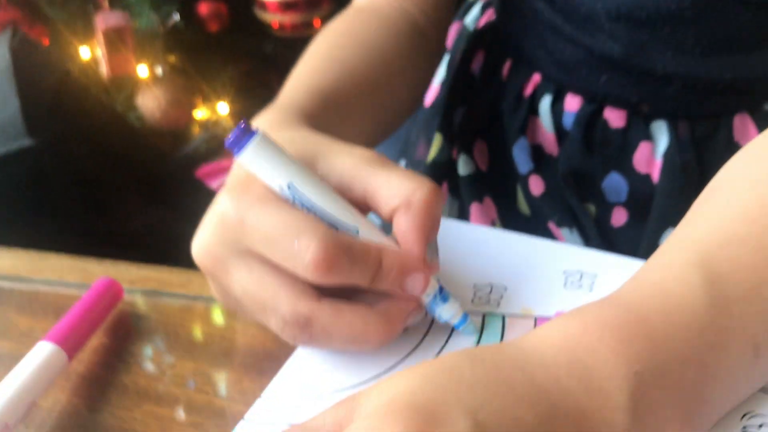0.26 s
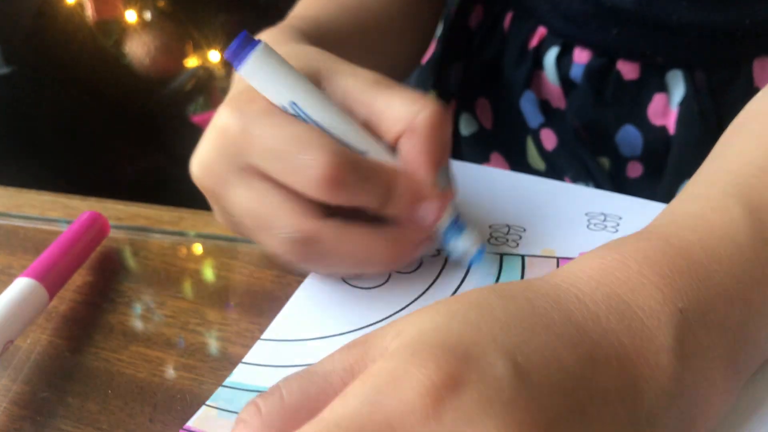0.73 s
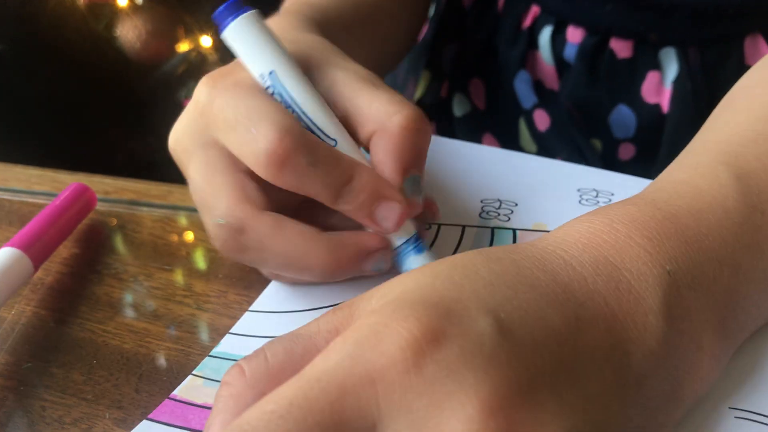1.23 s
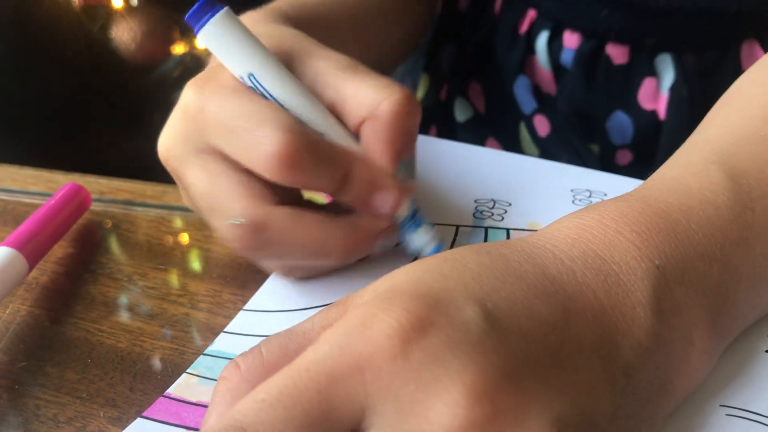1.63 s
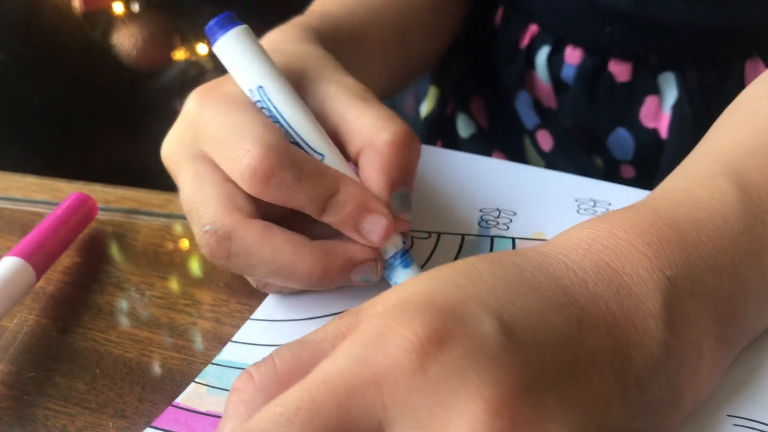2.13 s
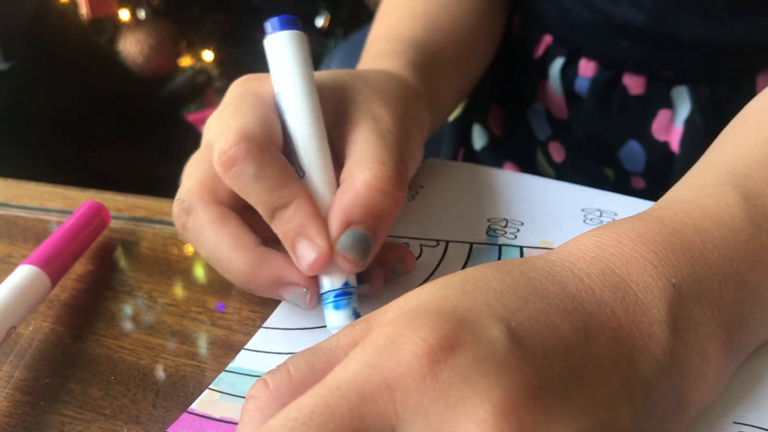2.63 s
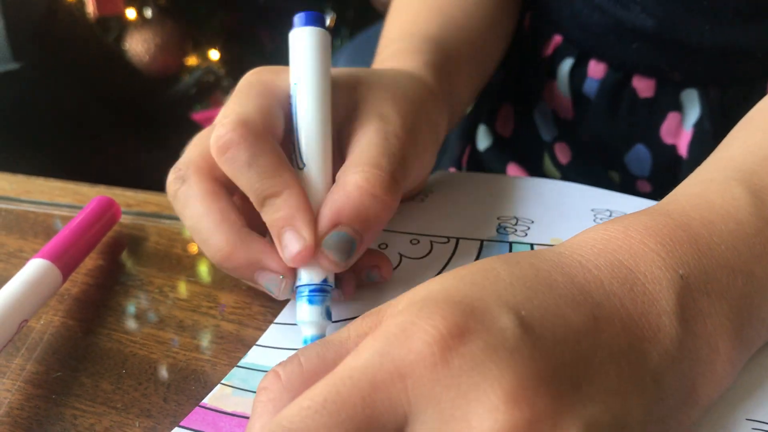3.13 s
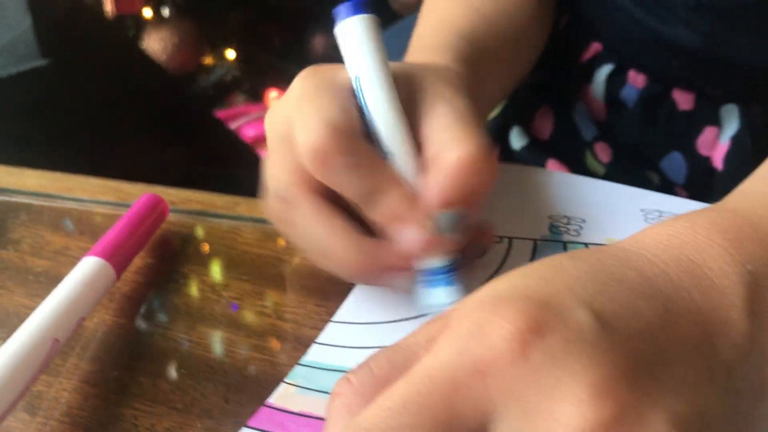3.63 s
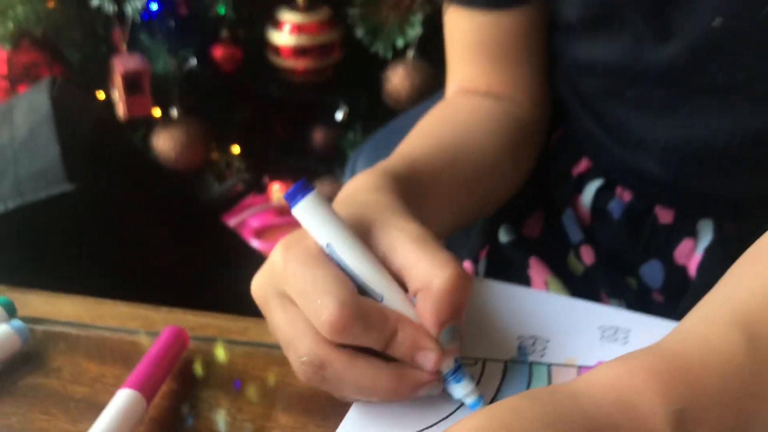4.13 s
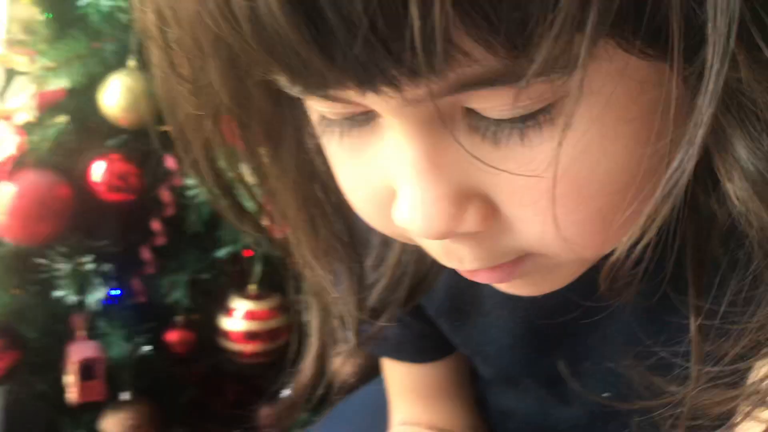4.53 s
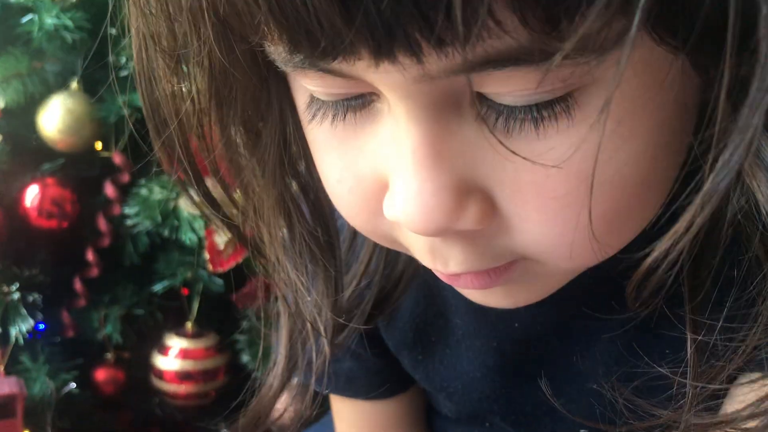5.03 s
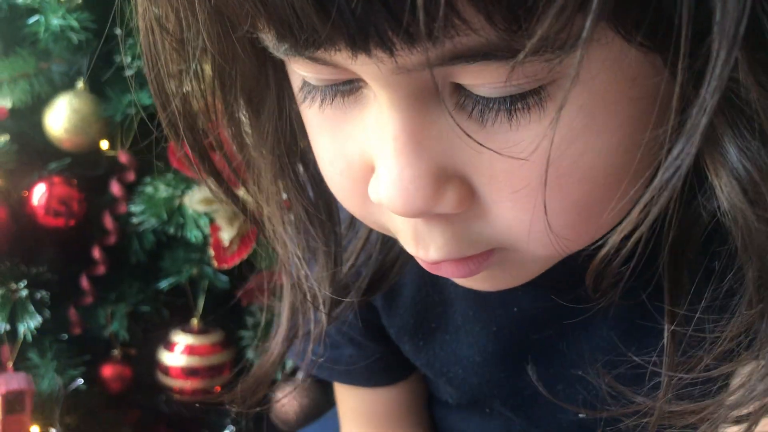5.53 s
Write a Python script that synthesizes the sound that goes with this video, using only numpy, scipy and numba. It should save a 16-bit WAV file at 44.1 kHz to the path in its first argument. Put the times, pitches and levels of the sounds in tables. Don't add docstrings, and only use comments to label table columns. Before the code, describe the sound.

A felt-tip marker scribbles in quick, dry back-and-forth strokes on paper over a wooden table, with small squeaks and knocks in a quiet room.

```python
import sys
import numpy as np
from scipy import signal
from scipy.io import wavfile
from scipy.ndimage import uniform_filter1d, map_coordinates
from numba import njit

SR = 44100
rng = np.random.default_rng(int(sys.argv[2]) if len(sys.argv) > 2 else 0)


def elevation(decibels):
    levels = np.asarray(decibels, float)
    return 10 ** (levels / 20)


def unload_audio(sound):
    columns = np.transpose(np.atleast_2d(sound))
    steps = np.round(np.clip(columns, -1, 1) * 32767)
    wavfile.write(sys.argv[1], SR, steps.astype(np.int16))


N = 254456
TIME = np.arange(N) / SR

# centre_hz, density_db_per_hz
AIR_SPECTRUM = [(32, -39), (55, -3.5), (97, -9.5), (188, -11.5), (613, -16), (740, -26), (1030, -16.5),
                (1340, -19.5), (1820, -26.5), (3360, -24.5), (3610, -26), (4790, -32.5), (6210, -31.5),
                (15600, -34.5)]
# time_s, air_db, hum_db
ROOM_LEVELS = [(0, -68, -2), (1.35, -67, -3.5), (1.448, -67.5, -1.5), (2.7, -69, -0.5), (4.2, -66.5, 0),
               (5.77, -68, 3.5)]
HUM_LINES_HZ = [32, 41.1, 99.9, 299.8, 329, 999.5]
HUM_LINES_DB = [-69, -64.5, -69.5, -74, -80, -81.5]
# time_s, level_db, centre_hz
HAND_RUB = [(0, -77, 520), (.96, -68, 640), (1.399, -78, 700), (1.75, -68, 700), (2.3, -73.5, 653),
            (2.68, -62, 670), (3.1, -73, 780), (3.85, -71, 683), (4.0, -64.5, 560), (4.38, -67, 540),
            (4.55, -71.5, 805), (5.2, -76.5, 860), (5.77, -68, 550)]
# start_s, peak_db, ring_hz
BUMPS = [
    (0.507, -58, 102),
    (.581, -59, 54.6),
    (.608, -52, 61),
    (.624, -49, 60),
    (.617, -51.5, 140),
    (.655, -56, 66),
    (.675, -58, 70),
]
# start_s, peak_db, thud_db, ring_hz, crack_db
KNOCKS = [(0.329, -54, -57, 1100, -80), (0.508, -50, -58, 1680, -46), (0.579, -47, -52, 700, -65),
          (3.008, -55, -52, 1000, -54), (3.574, -41, -62, 1870, -42), (3.775, -35.5, -72, 1860, -38),
          (5.525, -42, -57, 1150, -55), (5.578, -42.5, -66, 1140, -59), (5.7212, -33, -56, 2460, -39),
          (5.722, -44, -60, 4370, -45), (5.726, -43.5, -50, 597, -62)]
# start_s, length_s, rms_db, pitch_hz
SQUEAKS = [(1.498, 0.078, -52, 1660), (1.784, 0.044, -44, 1880), (2.444, 0.017, -51.5, 1840),
           (2.634, 0.056, -51, 1920), (3.195, 0.022, -54, 1250), (3.186, 0.028, -50.5, 1980),
           (3.208, 0.0134, -53, 840), (3.2, 0.014, -48, 3100), (3.616, 0.023, -47, 2130),
           (3.621, 0.029, -58.5, 736), (4.008, 0.048, -50.5, 1950), (4.518, 0.023, -53, 1760),
           (4.55, 0.026, -58, 2000), (4.581, .025, -61.5, 2140), (3.891, 0.1, -53.5, 4440),
           (5.133, 0.017, -57, 2450), (4.516, 0.082, -60.5, 950), (4.94, 0.073, -60, 930),
           (5.037, 0.035, -60, 1000), (5.124, 0.047, -61, 1010)]

# start_s, stop_s, early_db, mid_db, late_db (barrel level)
STROKES = [(0.445, 0.557, -53.5, -51.5, -46.5), (0.621, 0.745, -43.5, -41, -42),
           (0.788, 0.927, -40.5, -45.5, -45.5), (1.009, 1.151, -48, -44.5, -46.5),
           (1.215, 1.347, -49.5, -47, -49), (1.411, 1.563, -43, -45.5, -49.5),
           (1.646, 1.818, -49, -44, -45), (1.876, 2.009, -43, -48.5, -50.5), (2.06, 2.209, -48, -46.5, -50),
           (2.259, 2.401, -46.5, -48, -45), (2.455, 2.712, -48, -55.5, -50), (2.854, 2.999, -45, -43, -53),
           (3.054, 3.206, -53.5, -47, -41), (3.289, 3.425, -45, -45.5, -48),
           (3.479, 3.635, -44, -58, -46.5), (3.69, 3.837, -47.5, -54, -51),
           (3.888, 4.046, -52.5, -52.5, -47.5), (4.1, 4.213, -49.5, -48.5, -54.5),
           (4.273, 4.493, -54.5, -51, -52), (4.668, 4.799, -57, -51.5, -55),
           (4.858, 5.005, -54.5, -48, -59.5), (5.139, 5.226, -56.5, -55.5, -54),
           (5.295, 5.426, -53.5, -52.5, -56), (5.666, 5.726, -53.5, -51, -56)]
# start_s, stop_s, level_db, judder_db, hiss_db
TOUCHES = [(0, .025, -72.5, 0, -6), (0.041, .052, -66.5, -4.5, -7.5), (.073, 0.116, -63.5, -3, -1.5),
           (0.129, 0.132, -67, 6, -3), (.141, 0.166, -68.5, -2, -7), (0.347, 0.349, -72, 6.5, 8.5),
           (0.413, .421, -77, -3, -4), (2.738, 2.745, -54, 1, -7.5), (2.76, 2.766, -61.5, 10, -7),
           (4.521, 4.532, -52.5, 3, -8), (4.554, 4.562, -52, 1, -7), (4.572, 4.592, -70, 13, -5),
           (4.584, 4.61, -59, 5, -5), (5.05, 5.068, -71, 18, -6), (5.075, 5.094, -80, 11, -6),
           (5.455, 5.581, -62, 10, -3), (5.582, 5.583, -57, 10, -9), (5.744, 5.77, -76, 13, -2)]
# centre_s, half_width_s, change_db
SURGES = [
    (.54, .015, 1),
    (1.305, 0.0091, 5),
    (1.7, 0.015, -10),
    (1.79, 0.017, 0),
    (2.665, 0.031, 10),
    (3.13, .03, -1.5),
    (3.193, 0.016, 5),
    (4.125, .02, 1.5),
    (4.48, .012, 5),
]
# time_s, barrel_hz, fibre_hz, upright_db, pressure_db
GRIP = [(.5, 6500, 11200, -2.5, 3), (.68, 6530, 10800, -4.5, -4), (.86, 6870, 11300, -3, -3),
        (1.08, 6850, 10800, -3.5, -2.5), (1.49, 6360, 10500, -4, 2), (1.72, 6170, 11100, 0, 4.5),
        (2.12, 6540, 11700, -3, -1), (2.58, 6580, 11400, 1, -2), (2.92, 6600, 11800, -1.5, 3),
        (3.35, 6503, 12100, -0.5, -2), (3.76, 6320, 11500, 3, -1.5), (3.97, 6500, 11700, 4, 0.5),
        (4.16, 6100, 11500, -2, -2), (4.44, 7200, 12900, 1, -4), (4.729, 6800, 11800, -0.5, -0.5),
        (4.93, 7400, 12500, 0, -1), (5.18, 7300, 11800, 3.5, 0.5), (5.6, 6740, 12300, 1, -8.5)]

# centre_hz, width_hz, level_db; the first centre of barrel, paper and fibre follows its own track
BARREL_MODES = [(6600, 1640, -2), (5970, 1060, -6), (7340, 330, -3)]
NIB_MODES = [(1800, 1050, 0), (1304, 560, -4), (2770, 1940, -7.5)]
PAPER_MODES = [(4250, 860, -1), (5250, 920, -1.5), (5350, 630, -7), (3420, 810, -5)]
FIBRE_MODES = [(11800, 2600, 1), (8430, 1330, -1), (9630, 1500, -1.5), (13800, 6500, -4.5),
               (10770, 1500, -3.5), (15400, 1700, -7.5)]

MEAN_SLOPE = [1.0, 0.36, 0.63, 0.99]
SWAY_SLOPE = [0.92, 0.24, 0.39, 0.63]
BASE_DB = [-47.5, -57, -53, -47]
# start_loss_db, end_loss_db
SLOW_LOSS_DB = [(0, 2.5), (-2.5, -4), (0.5, 1), (5, 11.5)]
LEAD_S = [-.003, -0.00031, -0.00068, -0.003]
LAG_S = [-0.0058, 0.000028, -0.0032, -0.0051]

# centre_hz, width_hz, removed_share
HOLLOWS = [(3600, 640, 0.37), (7640, 400, 0.2), (10300, 340, 0.37)]
# delay_ms, share, drift_share
BOUNCES = [(0.6996, 0.1, 0.027), (0.4646, 0.18, 0.073)]
# centre_s, level_db, low_hz, high_hz
SIDE_BURSTS = [
    (2.563, -60, 4700, 8300),
    (3.328, -55, 9700, 14500),
    (3.725, -58, 9000, 9000),
    (5.165, -60, 7000, 14600),
]

USUAL_DB = -48
BARREL_HZ, PAPER_HZ = 6670, 4283
RISE_DB_PER_S, FALL_DB_PER_S, TOUCH_FALL_DB_PER_S = 2600, 1300, 2500


def unit(x):
    return x / np.sqrt(np.mean(x ** 2))


@njit
def svf(x, centre_hz, width_hz):
    y, band_state, low_state = np.empty(len(x)), 0., 0.
    for i in range(len(x)):
        g = np.tan(np.pi * centre_hz[i] / SR)
        damping = width_hz / centre_hz[i]
        v = (band_state + g * (x[i] - low_state)) / (1 + g * (g + damping))
        band_state = 2 * v - band_state
        low_state = low_state + 2 * g * v
        y[i] = damping * v
    return y


def band(x, centre_hz, width_hz):
    centre_hz = np.clip(centre_hz * np.ones(N), 10, .45 * SR)
    once = svf(x, centre_hz, 1. * width_hz)
    return svf(once, centre_hz, 1. * width_hz)


def walk(rate_hz):
    hold = int(SR / rate_hz)
    steps = np.repeat(rng.standard_normal(N // hold + 1), hold)
    return unit(uniform_filter1d(uniform_filter1d(steps, hold), hold)[:N])


def slips(rate_hz, spread_db):
    released = rng.random(N) < rate_hz / SR
    size = rng.exponential(size=N)
    return released * rng.standard_normal(N) * elevation(spread_db * size)


def room_air(air_db):
    hz, db = np.transpose(AIR_SPECTRUM)
    air, swell = 0, walk(0.2)
    for centre_hz in 45 * 2 ** np.arange(0, 8.5, 1 / 3):
        level_db = np.interp(np.log(centre_hz), np.log(hz), db) + 0.48 * swell + 2.6 * walk(9.1)
        noise = unit(band(rng.standard_normal(N), centre_hz, centre_hz / 3))
        air = air + elevation(level_db) * np.sqrt(centre_hz) * noise
    low = band(air, 193, 434)
    return air * elevation(air_db - 2.5) / np.sqrt(np.mean(low ** 2))


def appliance_hum():
    hum = 0
    for hz, db in zip(HUM_LINES_HZ, HUM_LINES_DB):
        level = np.sqrt(2) * elevation(db + 0.2 * walk(4))
        cycles = np.cumsum(hz + 0.13 * walk(3.25)) / SR
        hum = hum + level * np.sin(2 * np.pi * cycles)
    return hum


def room_tone():
    s, *levels = np.transpose(ROOM_LEVELS)
    air_db, hum_db = (np.interp(TIME, s, c) for c in levels)
    return room_air(air_db) + appliance_hum() * elevation(hum_db)


def hand():
    s, db, hz = np.transpose(HAND_RUB)
    drag = unit(band(slips(3000, 1.8), np.interp(TIME, s, hz), 740))
    return elevation(np.interp(TIME, s, db) + 1.64 * walk(12)) * drag


def knocks():
    crack, out = np.zeros(N), np.zeros(N)
    for s, db, thud_db, hz, crack_db in KNOCKS:
        age = np.maximum(TIME - s, 0)
        crack += (TIME >= s) * elevation(crack_db) * np.exp(-age / 0.0013)
        out += elevation(db - 2) * np.sin(2 * np.pi * hz * age) * np.exp(-age / 0.0021)
        out -= (TIME >= s) * elevation(thud_db + 9.5) * np.cos(2 * np.pi * 230 * age) * np.exp(-age / 0.0011)
    for s, db, hz in BUMPS:
        age = np.maximum(TIME - s, 0)
        swell = np.exp(-age / 0.013) * (1 - np.exp(-age / 0.0055))
        out += elevation(db + 9.0) * np.sin(2 * np.pi * hz * age) * swell
    return out + elevation(-3.0) * crack * unit(band(rng.standard_normal(N), 7700, 23000))


def squeaks():
    out, force = np.zeros(N), slips(1500, 2.0)
    for s, length_s, db, hz in SQUEAKS:
        part = (TIME - s) / length_s
        swell = np.clip(part, 0, 1) ** 0.47 * np.clip((1 - part) * 6, 0, 1)
        tone = band(force, hz, .22 * hz)
        out += elevation(db) * swell * tone / np.sqrt(np.mean(tone[swell > 0] ** 2))
    return out


def ring(grain, rate_hz, spread_db, modes, lead_hz, shift, wander_db):
    total = 0
    for k, (hz, width_hz, db) in enumerate(modes):
        centre_hz = lead_hz if k == 0 else hz * shift
        level = elevation(db + wander_db * walk(14))
        force = grain * slips(rate_hz, spread_db)
        total = total + level * band(force, centre_hz * (1 + 0.041 * walk(9)), width_hz)
    return unit(total)


def stroke_levels(upright_db, pressure_db):
    surge_db = sum(db * np.exp(-((TIME - s) / half_s) ** 2) for s, half_s, db in SURGES)
    rows = [(*row, 0, 0, FALL_DB_PER_S, True) for row in STROKES]
    for start, stop, db, judder_db, hiss_db in TOUCHES:
        rows.append((start, stop, db, db, db, judder_db, hiss_db, TOUCH_FALL_DB_PER_S, False))
    gains = np.zeros((4, N))
    for start, stop, early_db, mid_db, late_db, judder_db, hiss_db, fall, full in rows:
        on = slice(max(int((start - .03) * SR), 0), int((stop + .05) * SR))
        t = TIME[on]
        mean_db = (early_db + mid_db + late_db) / 3
        part = np.clip((t - start) / (stop - start), 0, 1)
        sway_db = np.interp(part, [.1, .5, .9], [early_db, mid_db, late_db]) - mean_db + surge_db[on]
        light_db = min(mean_db - USUAL_DB + 7, 0)
        excess_db = mean_db - light_db - USUAL_DB
        slowness = np.abs(2 * part - 1) ** 4.0
        grip_db = [0, pressure_db[on] + judder_db, 0.34 * pressure_db[on], upright_db[on] + hiss_db]
        for k in range(4):
            early_s = np.maximum(start - full * LEAD_S[k] - t, 0)
            late_s = np.maximum(t - stop - full * LAG_S[k], 0)
            edge_db = RISE_DB_PER_S * early_s + fall * late_s
            slow_db = full * np.where(part < .5, *SLOW_LOSS_DB[k]) * slowness
            hold_db = BASE_DB[k] + light_db + MEAN_SLOPE[k] * excess_db + SWAY_SLOPE[k] * sway_db
            gains[k, on] += elevation(hold_db + grip_db[k] - slow_db - edge_db)
    return gains


def marker():
    s, *tracks = np.transpose(GRIP)
    barrel_hz, fibre_hz, upright_db, pressure_db = (np.interp(TIME, s, c) for c in tracks)
    lean = barrel_hz / BARREL_HZ
    grain = elevation(0.86 * walk(350) + 0.95 * walk(60))
    barrel, nib, paper, fibre = stroke_levels(upright_db, pressure_db)
    paper_hz = PAPER_HZ * lean ** 0.55
    return (barrel * ring(grain, 16000, 1.0, BARREL_MODES, barrel_hz, lean ** 0.46, 1.0)
            + nib * ring(grain, 6000, 0.97, NIB_MODES, NIB_MODES[0][0], 0.98, 1.8)
            + paper * ring(grain, 12000, 0.49, PAPER_MODES, paper_hz, lean ** 0.22, 1.0)
            + fibre * ring(grain, 16000, 0.71, FIBRE_MODES, fibre_hz, lean ** 0.26, 0.74))


def table_top(x):
    for hz, width_hz, share in HOLLOWS:
        x = x - np.clip(share, 0, 1) * svf(x, hz * np.ones(N), 1. * width_hz)
    out = x
    for delay_ms, share, drift in BOUNCES:
        delay = delay_ms * (1 + drift * walk(4.034)) * SR / 1000
        out = out + share * map_coordinates(x, [TIME * SR - delay], mode="mirror")
    return out


def scene():
    near = table_top(marker()) + squeaks() + knocks() + hand()
    age = TIME[:SR // 4]
    decay = np.exp(-np.log(1000) * age / 0.13)
    tail = rng.standard_normal(len(age)) * decay * (age > .004)
    wet = signal.fftconvolve(near, tail / np.sqrt(np.sum(tail ** 2)))[:N]
    mono = near + elevation(-20) * wet + room_tone()
    return np.array([mono, mono])


def band_limit(x):
    return signal.sosfilt(signal.butter(12, 15770, fs=SR, output="sos"), x)


def record(dry):
    side = 0
    for s, db, low_hz, high_hz in SIDE_BURSTS:
        swell = np.cos(np.pi / 2 * np.clip((TIME - s) * SR / 1024, -1, 1))
        noise = sum(band(rng.standard_normal(N), hz, 0.068 * hz) for hz in (low_hz, high_hz))
        side = side + elevation(db) * swell * unit(noise)
    top_cut = signal.ellip(10, .2, 90, 15780, fs=SR, output="sos")
    mix = signal.sosfilt(top_cut, dry + np.array([side, -side]))
    return band_limit(mix)


dry = scene()
out = record(dry)
unload_audio(out)
```